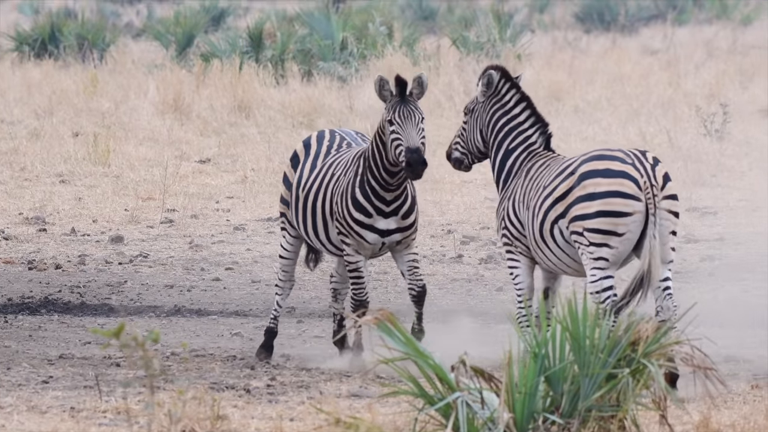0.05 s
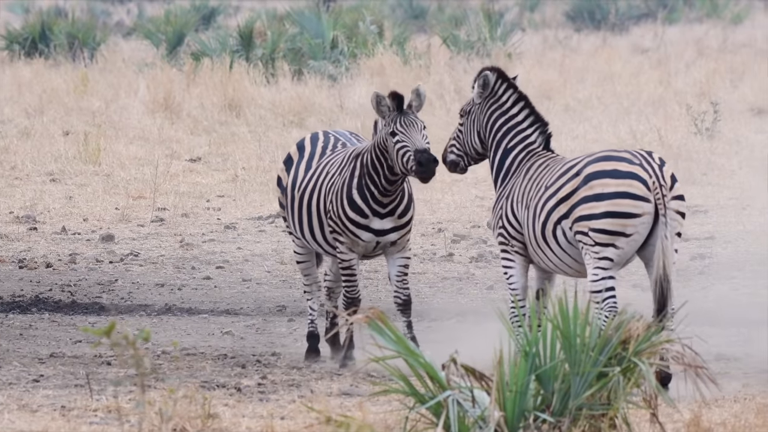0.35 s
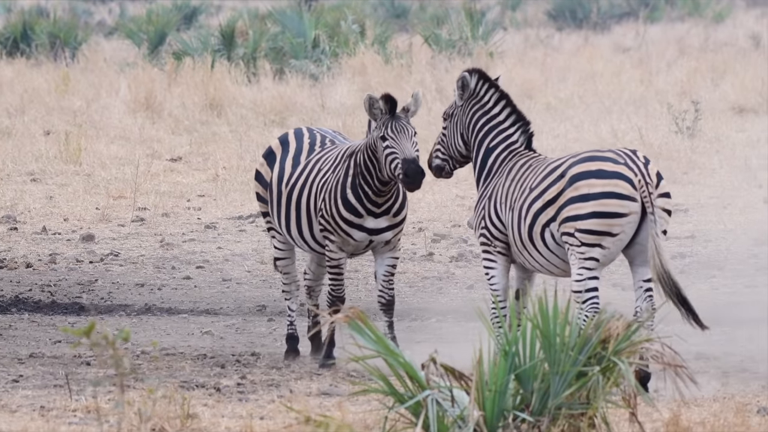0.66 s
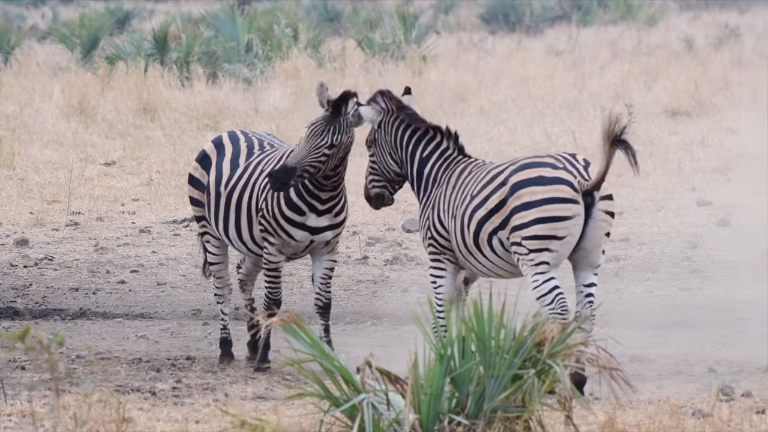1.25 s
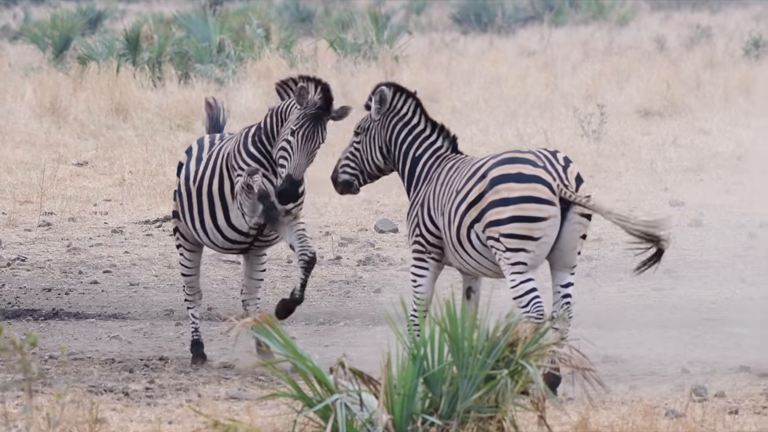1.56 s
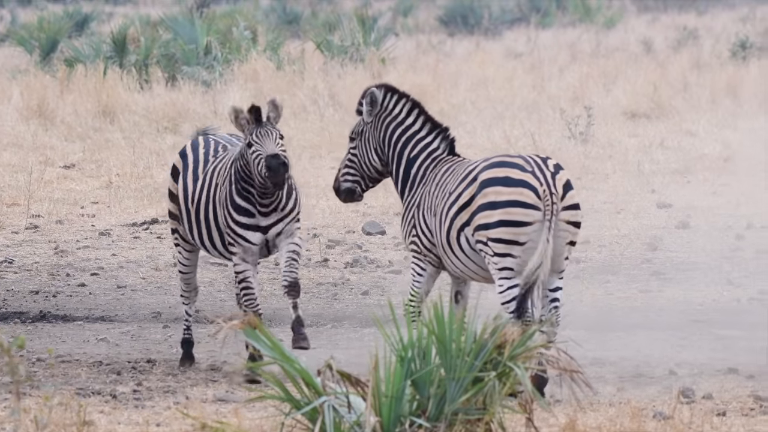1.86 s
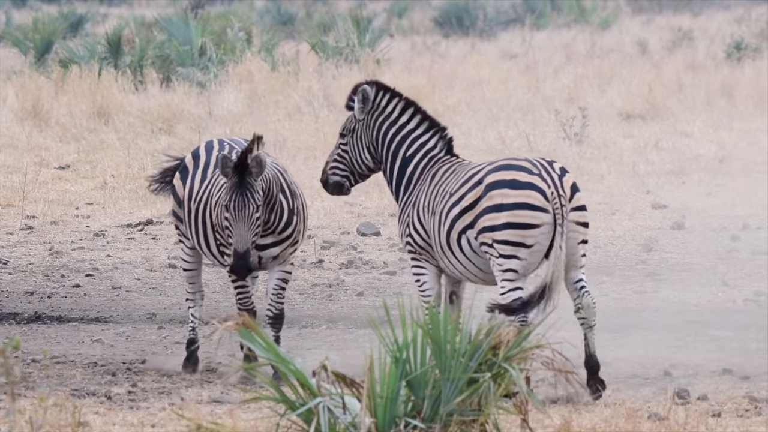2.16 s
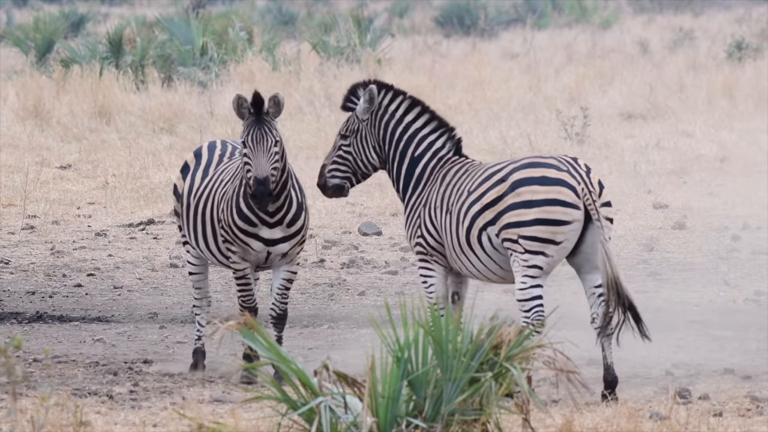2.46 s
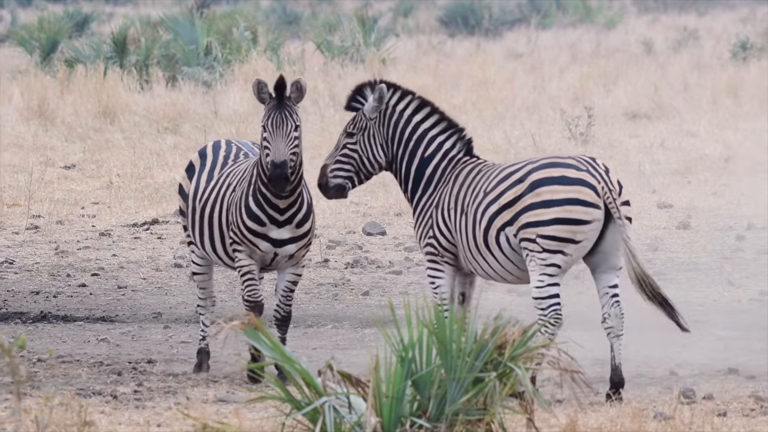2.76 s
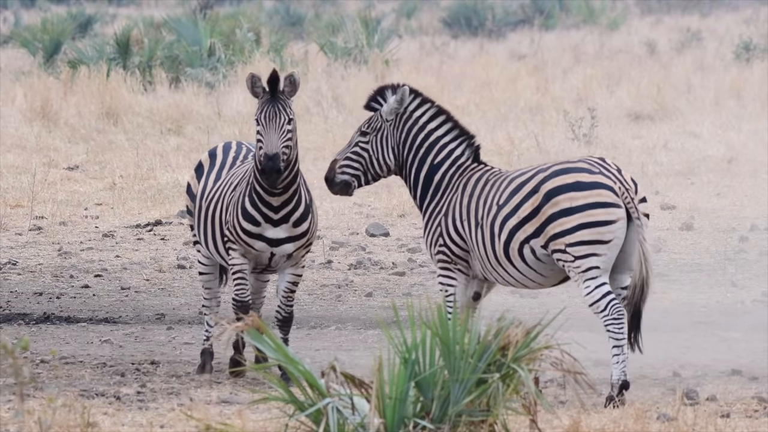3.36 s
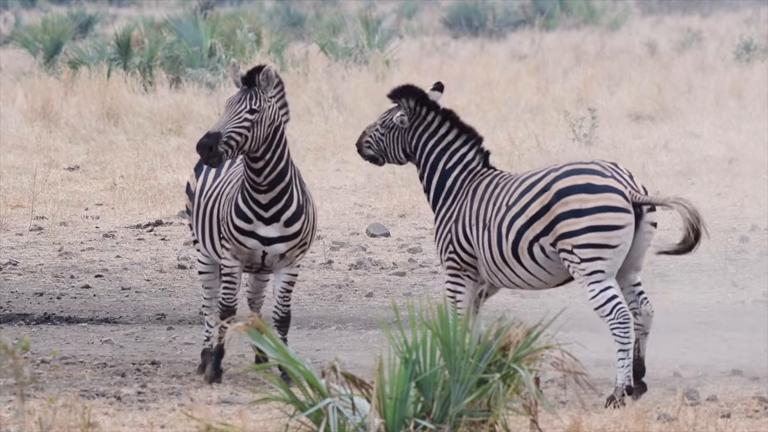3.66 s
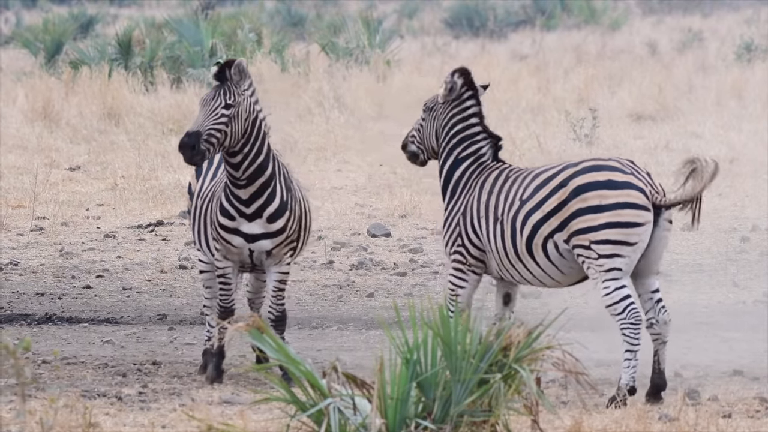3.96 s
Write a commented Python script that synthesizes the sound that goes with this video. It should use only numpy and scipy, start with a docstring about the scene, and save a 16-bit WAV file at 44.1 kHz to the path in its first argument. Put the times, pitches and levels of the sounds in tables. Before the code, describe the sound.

A high, steady insect drone with quick camera shutter clicks and faint birdsong in dry bushland.

```python
"""A cicada-like insect drones high and steady in dry bushland, its membrane clicking in fast groups.
Close to the microphone two camera shutters fire twice each, clattering like short snorts.
Birds whistle, warble and trill in the scrub, and the hooves of two sparring zebras thud softly.
There is one dry tick, and behind it all a light breeze and the distant rush of open country."""
import sys
import numpy as np
from scipy import signal
from scipy.fft import rfft, irfft
from scipy.io import wavfile
from scipy.ndimage import uniform_filter1d

SR = 44100
rng = np.random.default_rng(int(sys.argv[2]) if len(sys.argv) > 2 else 0)


def put_to_file(sound):
    """Save the sound as 16-bit audio at rate SR, in the file named by the first command-line argument."""
    columns = np.atleast_2d(sound).T  # one column per channel
    safe = np.clip(columns, -1, 1)
    whole_steps = np.round(safe * 32767)
    wavfile.write(sys.argv[1], SR, whole_steps.astype(np.int16))


N = 176400
T = np.arange(N) / SR


def insect():
    """A membrane buckles, two ribs a stroke; a second beat opens and shuts its resonator, so it throbs."""
    # the four strokes of one membrane cycle: direction (in or out), second_rib_delay_s
    strokes = [(1, .00072), (-1, .00081), (1, .00077), (1, .00086)]
    # spectrum of the resonator: frequency_hz, gain_db
    drone_colour = [(3530, -40), (6000, -26), (6480, -15), (6620, -11), (6970, -1.5), (7260, -0.5),
                    (7330, 4.5), (7780, 7.5), (8430, 0.5), (9040, 6.5), (9320, -3.5), (9500, -9.5),
                    (10200, 0.5), (10500, -36.5), (10600, -21), (13800, -78), (22000, -120)]
    # spectrum of the sizzle above it: frequency_hz, gain_db
    sizzle_colour = [(10700, 0), (11500, -1), (12400, 3), (13400, -1.5), (14500, 1), (14900, -1),
                     (15600, -22)]
    click_hz, group_hz, throb_hz = 370.5, 95.1, 8.9
    jitter_s, scatter_db, second_rib_db, open_share = 3.5e-6, .8, 5, .58
    foliage = dict(t60_s=.03, side_db=-2)

    clock = np.cumsum(1 + .0014 * walk(20)) / SR  # the click rate wanders slightly
    k = np.arange(int(clock[-1] * click_hz))
    jitter, scatter = rng.standard_normal((len(k), 2)).T
    direction, rib_delay = np.array(strokes)[k % len(strokes)].T
    times = np.interp(k / click_hz, clock, T) + jitter_s * jitter
    sizes = direction * undb(scatter_db * scatter)

    beat = np.cos(2 * np.pi * group_hz * k / click_hz) - np.cos(np.pi * open_share)
    grouped = sizes * (1.5 + .5 * np.tanh(8 * beat))  # twice as strong with the resonator open
    ribs = clicks(times, grouped) + undb(second_rib_db) * clicks(times + rib_delay, grouped)
    drone = colour(ribs, drone_colour, skirt_db=64)
    drone = undb(-41.5) * off_centre(drone, left_db=-2.1, lag_s=21e-6)
    sizzle = colour(clicks(times, sizes), sizzle_colour, skirt_db=142)  # even, not grouped
    sizzle = undb(-59.5) * off_centre(sizzle, left_db=2, lag_s=10e-6)
    sizzle = scrub(sizzle, wet_db=0, **foliage)

    # farther insects blend into a haze
    haze = undb(-49) * colour(noise(side_db=-2), drone_colour, skirt_db=81)
    haze += undb(-59.5) * colour(noise(side_db=-2), sizzle_colour, skirt_db=144)
    throb_db = .61 * (np.sin(2 * np.pi * throb_hz * T + walk(3)) + .63 * walk(10))
    return undb(throb_db) * (scrub(drone + sizzle, wet_db=-8, **foliage) + haze)


def shutter(shots, strokes, body, rings, motor_s, motor_db=-16.5):
    """Each shot runs the same chain of strokes over a whirring motor, all ringing the camera body."""
    power = np.zeros(N)
    for start, db in shots:
        motor_on = (T > start + motor_s[0]) & (T < start + motor_s[1])
        motor = uniform_filter1d(1. * motor_on, size=300)
        power += (undb(db + motor_db) * motor) ** 2
        for delay, stroke_db, attack, decay in strokes:
            power += (undb(db + stroke_db) * blow(start + delay, attack, decay)) ** 2
    rattle = unit(np.tanh(noise(side_db=-11)))
    clatter = colour(np.sqrt(power) * rattle, body, rings, skirt_db=8)
    return scrub(clatter, wet_db=-17, t60_s=.22, side_db=5)


def soft_camera():
    """The first camera, close by: its motor starts just ahead of each snap."""
    # shutter releases: start_s, level_db
    shots = [(1.524, -30.5), (1.690, -29)]
    # strokes of one shot: delay_s, gain_db, attack_s, decay_s
    strokes = [(-.017, -17, 0.0023, 0.0033), (0, 3.5, 0.00044, 0.0068), (.008, -9.5, .002, 0.02),
               (0.055, -10.5, 0.0022, 0.031)]
    # spectrum of the body: frequency_hz, gain_db
    body = [(88, -51), (150, -26), (338, -21), (825, -1), (1030, -6), (1180, -8.5), (1470, -6),
            (1860, -1.5), (3370, -10), (4000, -16), (4330, -13), (5140, -14), (6300, -19), (8190, -48),
            (13900, -120)]
    # its resonances: centre_hz, width_hz, lift_db
    rings = [(653, 92, 7), (1197, 107, 13), (1800, 150, 0.5), (3990, 150, 13.5)]
    return shutter(shots, strokes, body, rings, motor_s=(-.056, .096))


def loud_camera():
    """The second camera, close by: mirror, curtain and winder strike in a longer clatter."""
    # shutter releases: start_s, level_db
    shots = [(1.827, -25.5), (2.0255, -25)]
    # strokes of one shot: delay_s, gain_db, attack_s, decay_s
    strokes = [(0, -6.5, 0.00044, 0.012), (0.026, -6, 0.012, 0.0045), (0.0509, -0.5, 0.00053, 0.0061),
               (.057, -23, .001, .005), (.07, -6.5, .0015, 0.013), (.084, -8, .002, .006),
               (.09, -4.5, 0.0043, 0.0088), (.101, -21, 0.0018, 0.0087)]
    # spectrum of the body: frequency_hz, gain_db
    body = [(88, -78), (150, -32.5), (255, -19.5), (383, -21), (739, 4.5), (851, -12), (935, -7.5),
            (1060, -16.5), (1150, -8.5), (1690, -1), (2390, -6.5), (3760, -9), (6300, -17), (8190, -16),
            (13900, -120)]
    # its resonances: centre_hz, width_hz, lift_db
    rings = [(694, 91, -3), (953, 110, 8), (1172, 39, 8), (1610, 110, 3), (2065, 35, 8.5), (3760, 270, 3.5),
             (5760, 340, 4)]
    return shutter(shots, strokes, body, rings, motor_s=(0, .1137))


def birds():
    """One long rising whistle, warbled notes and slowing trills, echoed by the bushes."""
    # course of the whistle: time_s, pitch_hz, level_db
    whistle = [(3.055, 2390, -59), (3.08, 2560, -41), (3.109, 2653, -40.5), (3.135, 2884, -41),
               (3.163, 2930, -35.5), (3.216, 3116, -46.5), (3.275, 3240, -48), (3.314, 3180, -63)]
    # gliding notes: start_s, length_s, first_hz, middle_hz, last_hz, level_db, warble_depth_hz
    notes = [(.01, 0.13, 3700, 3480, 3190, -60.5, 130), (0.322, 0.12, 4270, 3560, 3150, -64, 140),
             (.5, 0.078, 2270, 2217, 2160, -60, 102), (0.702, 0.14, 3940, 3400, 3360, -60.5, 145),
             (2.834, .15, 3270, 2394, 2005, -44, 164), (3.141, 0.093, 1380, 1595, 2070, -57.5, 16),
             (3.326, 0.12, 3800, 3390, 3220, -52.5, 95), (3.375, 0.14, 3247, 2430, 2087, -41.5, 170),
             (3.565, 0.055, 2186, 1850, 1640, -55.5, 100), (3.672, 0.092, 3350, 3396, 3580, -56, 92),
             (3.704, 0.17, 1980, 2714, 2980, -48.5, 25), (3.744, 0.039, 3350, 3000, 2800, -51, 220),
             (3.768, 0.063, 3820, 3980, 4200, -56, 46), (3.86, .055, 3250, 3100, 2500, -51, 50),
             (3.909, 0.055, 3220, 3050, 2820, -47, 41), (3.965, 0.1, 3150, 3050, 2830, -60.5, 80)]
    # trills of a small bird: start_s, level_db
    trills = [(0.221, -53.5), (1.468, -55), (2.648, -54), (3.86, -52)]
    # chips of one trill: delay_s, gain_db
    chips = [(0, -13), (.037, -11), (.076, -9.5), (.116, -10.5), (.156, -10), (.198, -9), (.244, -6),
             (.301, -4.5), (0.358, -7.5), (.419, -6.5), (0.48, -6.5), (.539, -4.5)]
    quaver_hz, warble_hz = 58, 46
    chip_s, chip_from_hz, chip_to_hz = .026, 5050, 4000

    times, pitches, levels = np.array(whistle).T
    quaver = 33.4 * (np.sin(2 * np.pi * quaver_hz * T) + .5 * walk(150))
    envelope = undb(np.interp(T, times, levels)) * ((T > times[0]) & (T < times[-1]))
    song = envelope * tone(np.interp(T, times, pitches) + quaver)

    warble = np.sin(2 * np.pi * warble_hz * T) + .5 * walk(300)
    flutter = undb(3.25 * walk(120))
    for start, length, first, middle, last, db, depth in notes:
        on = (T > start) & (T < start + length)
        progress = (T[on] - start) / length
        arch = np.polyfit([0, .5, 1], [first, middle, last], 2)
        pitch = np.polyval(arch, progress) + depth * warble[on]
        song[on] += undb(db) * np.sin(np.pi * progress) * flutter[on] * tone(pitch)

    for start, db in trills:
        for delay, chip_db in chips:
            on = (T > start + delay) & (T < start + delay + chip_s)
            progress = (T[on] - start - delay) / chip_s
            pitch = chip_from_hz + (chip_to_hz - chip_from_hz) * progress
            song[on] += undb(db + chip_db) * np.sin(np.pi * progress) * tone(pitch)
    return scrub(song, wet_db=-5, t60_s=.42, side_db=-5)


def hooves():
    """Zebra hooves land on dry ground with soft, low thuds."""
    # hoof falls: start_s, level_db
    falls = [(.939, -55), (1.359, -52), (2.202, -43.5), (2.224, -56), (2.879, -48), (2.955, -58),
             (3.694, -44), (3.709, -54)]
    # spectrum of a thud: frequency_hz, gain_db
    thud_colour = [(70, -23), (130, -2.5), (260, -3), (600, 0.5), (1500, -19), (5000, -23)]
    return knocks(falls, thud_colour, decay_s=.0059)


def dry_tick():
    """One small, bright impact near the start."""
    # the impact: start_s, level_db
    ticks = [(.114, -45)]
    # its spectrum: frequency_hz, gain_db
    tick_colour = [(600, -22), (1400, 2), (3000, 7), (5000, -30)]
    return knocks(ticks, tick_colour, decay_s=.0058)


def air():
    """Distant rush of open country, with a breeze that slowly turns lower in tone."""
    # spectrum of the rush: frequency_hz, gain_db
    rush_colour = [(24, -33), (40, -30.5), (156, -14.5), (319, -11), (573, -5.5), (611, -1), (650, -6.5),
                   (909, -5), (989, -4.5), (1100, -17.5), (1270, -10.5), (1850, -9), (2060, -9.5),
                   (3070, -17.5), (4470, -19.5), (5180, -28), (6000, -21), (7800, -34), (13200, -120)]
    # bands of breeze in the grass: centre_hz, width_hz, start_level_db, end_level_db
    breeze = [(1293, 230, -55.5, -63), (627.6, 157, -65, -56), (962, 230, -71.5, -55.5)]
    rush = undb(-55.5 + .93 * walk(8.16)) * colour(noise(side_db=-7), rush_colour, skirt_db=15)
    for hz, width, first, last in breeze:
        band = colour(noise(side_db=-6), [(hz - width / 2, 0), (hz + width / 2, 0)], skirt_db=66)
        drift_db = first + (last - first) * T / T[-1]
        rush += band * undb(drift_db + 3.6 * walk(7.3))
    return rush


def scrub(x, wet_db, t60_s, side_db):
    """Direct sound plus a diffuse tail from ground and bushes."""
    tail = noise(side_db)[:, :SR // 2] * np.exp(-np.log(1000) * T[:SR // 2] / t60_s)
    tail /= np.sqrt(np.sum(tail ** 2) / 2)
    return x + undb(wet_db) * signal.fftconvolve(np.atleast_2d(x), tail, axes=1)[:, :N]


def off_centre(x, left_db, lag_s):
    """A source a little to one side, at rms 1; it reaches the right channel later."""
    hz = np.arange(N // 2 + 1) * SR / N
    late = irfft(rfft(x) * np.exp(-2j * np.pi * hz * lag_s), N)
    return unit(np.array([x * undb(left_db / 2), late * undb(-left_db / 2)]))


def knocks(hits, spectrum, decay_s):
    """Short impacts on the ground: bursts of noise that carry into the bushes."""
    force = sum(undb(db) * blow(start, .003, decay_s) for start, db in hits)
    return scrub(colour(force * noise(side_db=-11), spectrum), wet_db=-8, t60_s=.58, side_db=-12)


def clicks(times, sizes):
    """Sharp clicks, placed between samples by a windowed sinc."""
    train, taps = np.zeros(N), np.arange(-8, 9)
    position = times[:, None] * SR
    index = position.astype(int) + taps
    np.add.at(train, index % N, sizes[:, None] * np.sinc(index - position) * np.hanning(len(taps)))
    return train


def blow(start, attack, decay):
    """A quick rise and an exponential fall."""
    return np.clip((T - start) / attack, 0, 1) * np.exp(-np.maximum(T - start - attack, 0) / decay)


def tone(hz):
    """A pure whistle on a pitch curve."""
    return np.sqrt(2) * np.sin(2 * np.pi * np.cumsum(hz) / SR)


def colour(x, points, rings=(), skirt_db=24):
    """Unit-power filter through (Hz, dB) points plus resonances, falling skirt_db an octave outside."""
    f = np.arange(N // 2 + 1) * SR / N + 1
    hz, db = np.array(points, float).T
    octaves_outside = np.abs(np.log2(f / np.clip(f, hz[0], hz[-1])))
    curve_db = np.interp(np.log2(f), np.log2(hz), db) - skirt_db * octaves_outside
    for centre, width, lift in rings:
        curve_db += lift / (1 + (2 * (f - centre) / width) ** 2)
    gain = unit(undb(np.maximum(curve_db, -100)))
    cepstrum = irfft(np.log(gain), N)
    cepstrum[1:N // 2] *= 2  # minimum phase: the ringing follows the strike
    cepstrum[N // 2 + 1:] = 0
    return irfft(rfft(x) * np.exp(rfft(cepstrum)), N)


def noise(side_db):
    """Stereo white noise; side_db sets its width."""
    mid, side = rng.standard_normal((2, N))
    return unit(mid + undb(side_db) * side * np.array([[1], [-1]]))


def walk(rate_hz):
    """Smooth random wander at rms 1."""
    hold = max(int(SR / rate_hz), 1)
    steps = np.repeat(rng.standard_normal(N // hold + 1), hold)
    return unit(uniform_filter1d(uniform_filter1d(steps, hold), hold)[:N])


def undb(db):
    """Decibels to gain."""
    return 10 ** (np.asarray(db) / 20)


def unit(x):
    """Scale to rms 1."""
    return x / np.sqrt(np.mean(x ** 2))


def scene():
    """Everything that reaches the stereo microphone."""
    return soft_camera() + loud_camera() + hooves() + dry_tick() + air() + birds() + insect()


def record(dry):
    """The recorder cuts the top steeply."""
    top_hz = 15600
    return signal.sosfilt(signal.ellip(10, .2, 80, top_hz, fs=SR, output="sos"), dry)


dry = scene()
out = record(dry)
put_to_file(out)
```